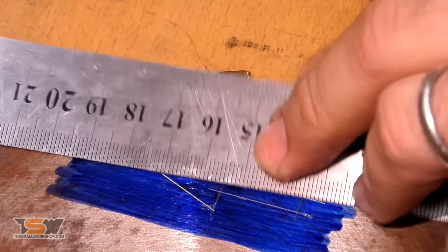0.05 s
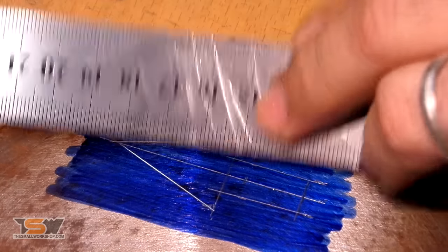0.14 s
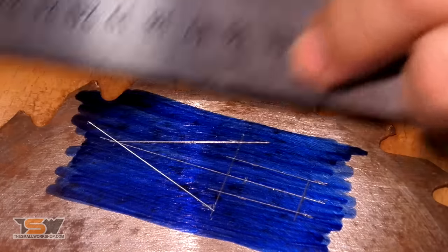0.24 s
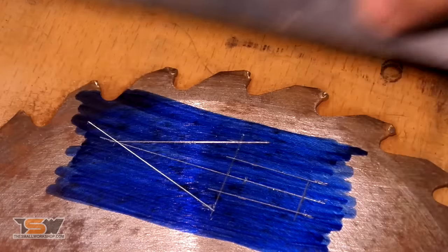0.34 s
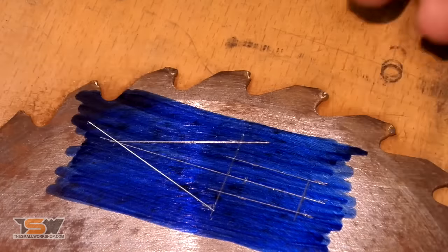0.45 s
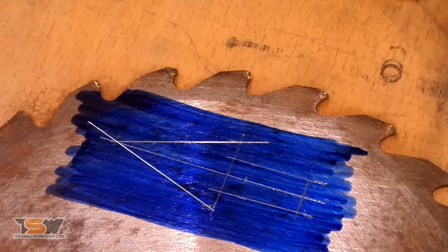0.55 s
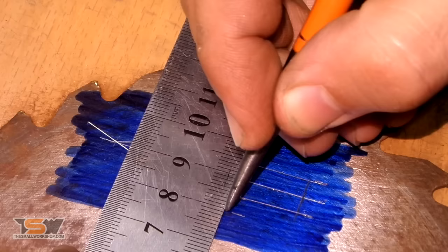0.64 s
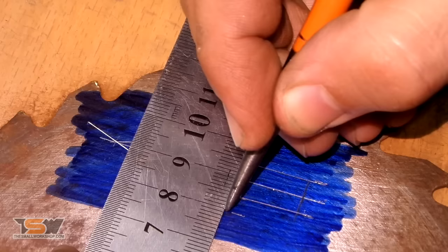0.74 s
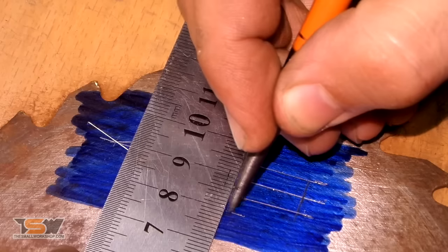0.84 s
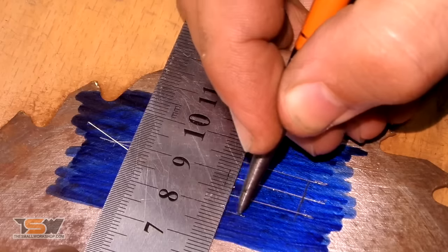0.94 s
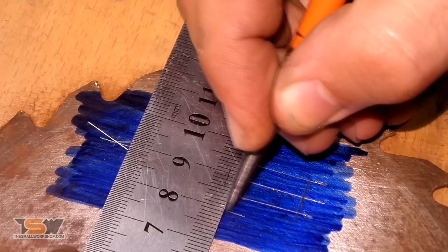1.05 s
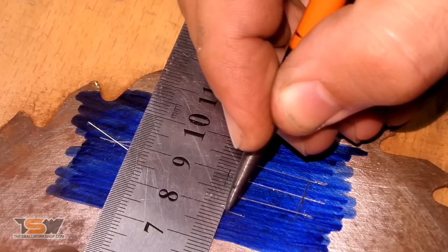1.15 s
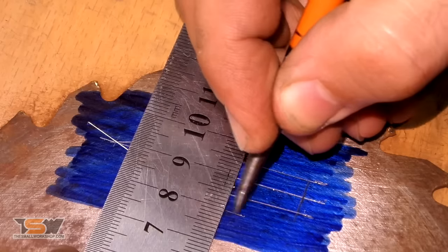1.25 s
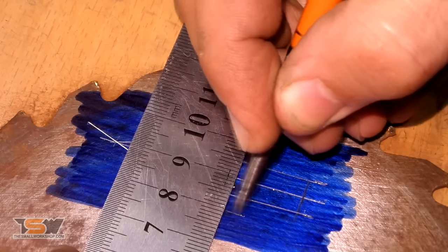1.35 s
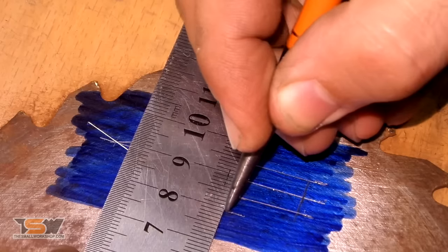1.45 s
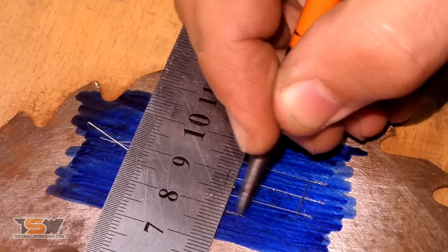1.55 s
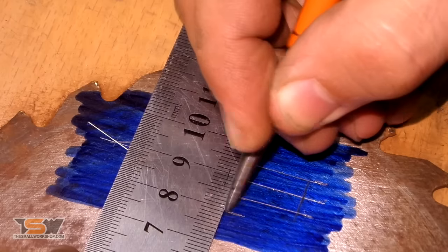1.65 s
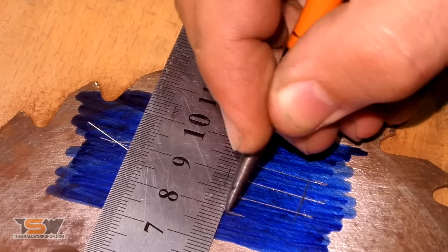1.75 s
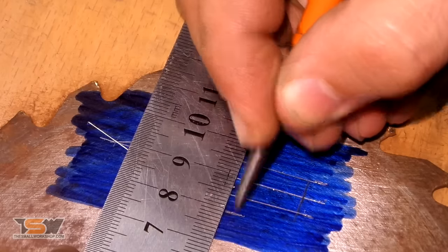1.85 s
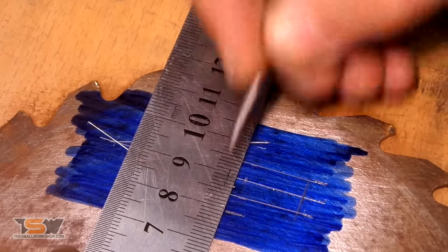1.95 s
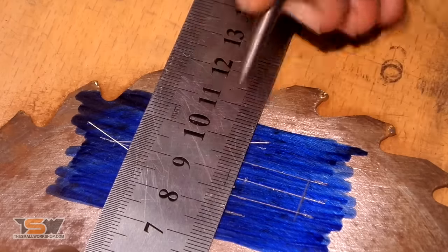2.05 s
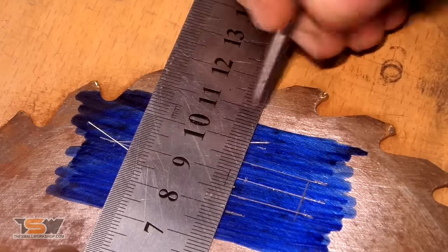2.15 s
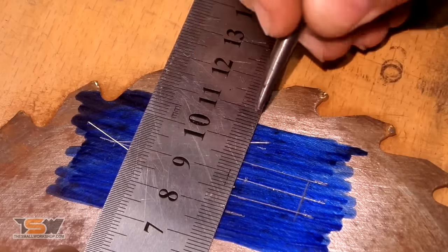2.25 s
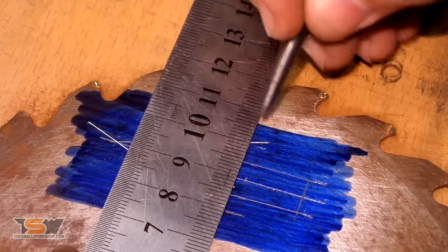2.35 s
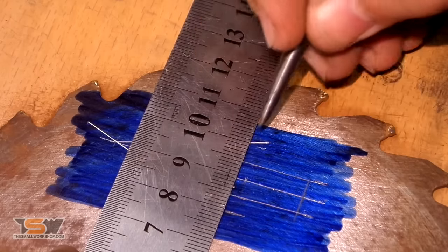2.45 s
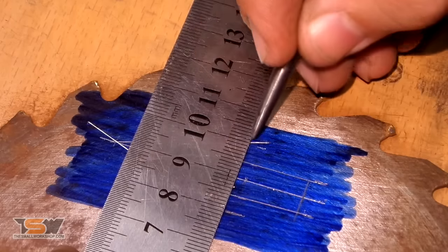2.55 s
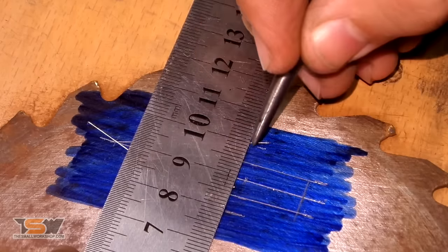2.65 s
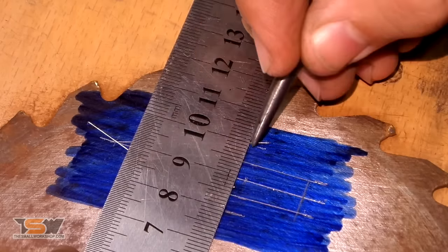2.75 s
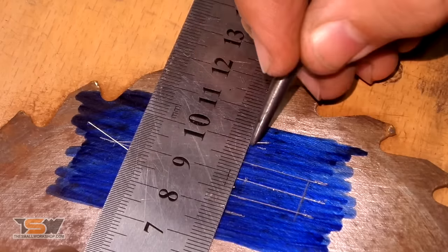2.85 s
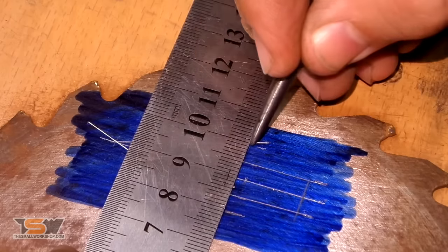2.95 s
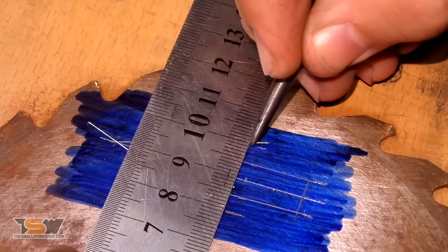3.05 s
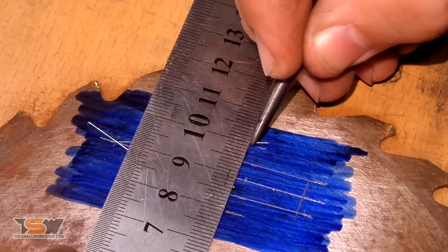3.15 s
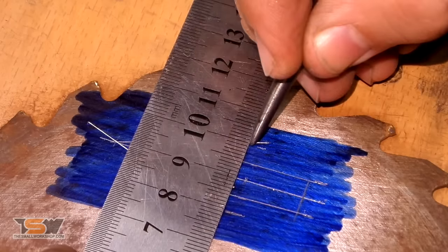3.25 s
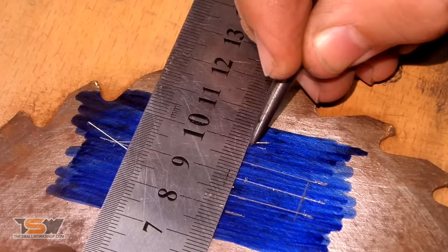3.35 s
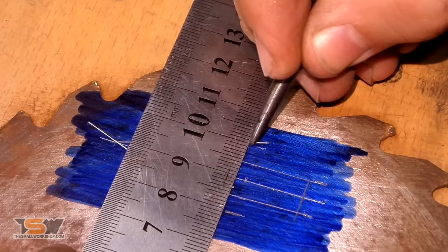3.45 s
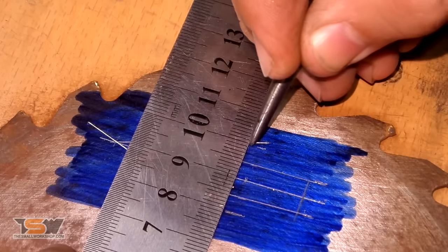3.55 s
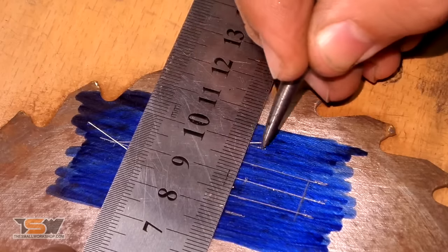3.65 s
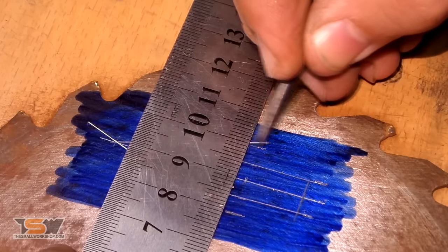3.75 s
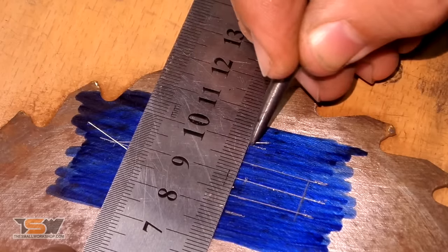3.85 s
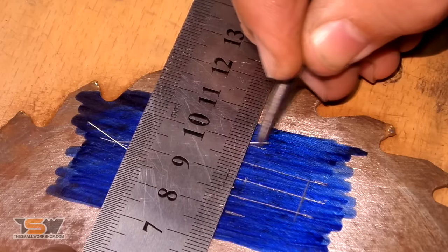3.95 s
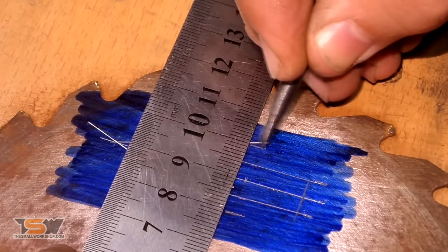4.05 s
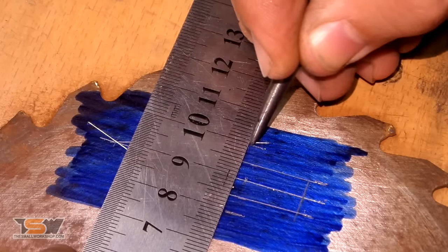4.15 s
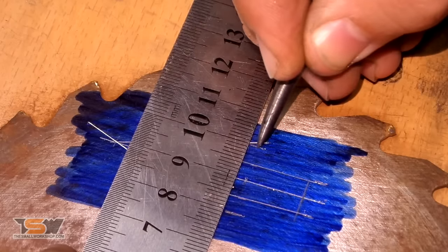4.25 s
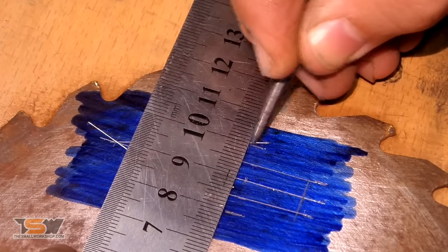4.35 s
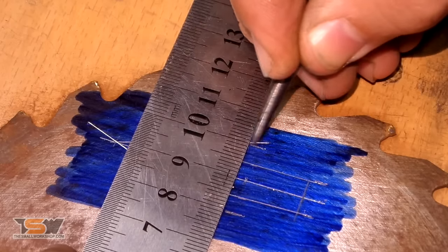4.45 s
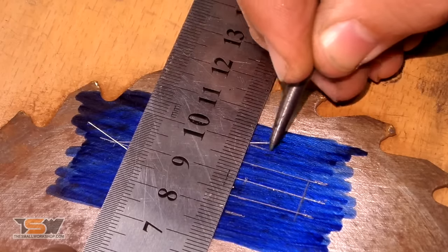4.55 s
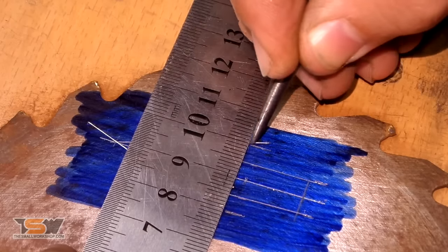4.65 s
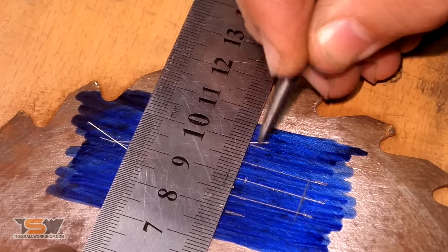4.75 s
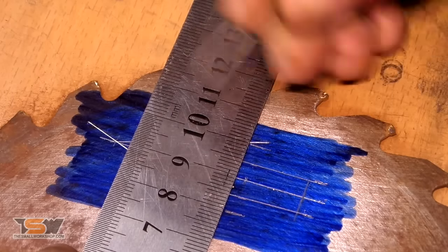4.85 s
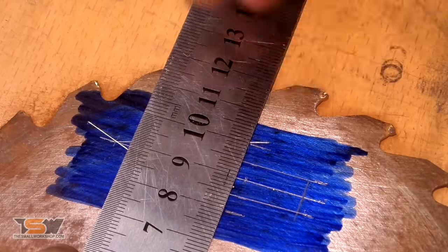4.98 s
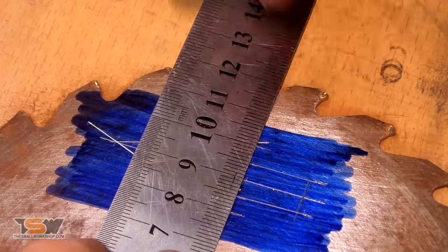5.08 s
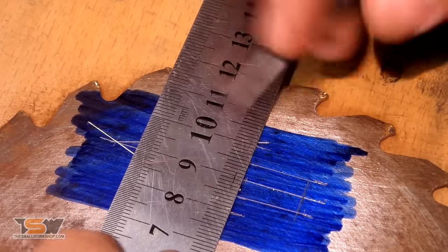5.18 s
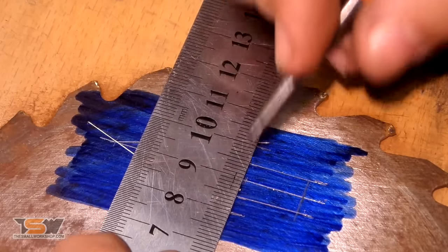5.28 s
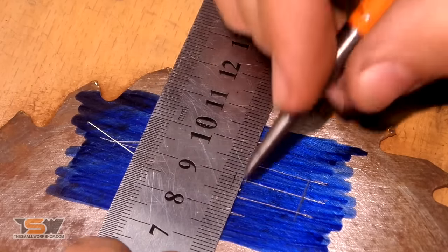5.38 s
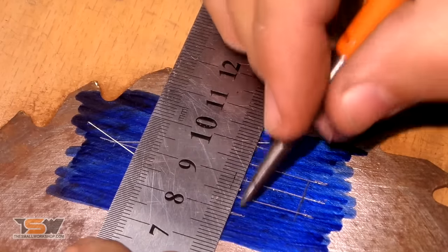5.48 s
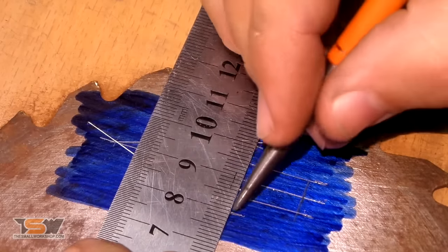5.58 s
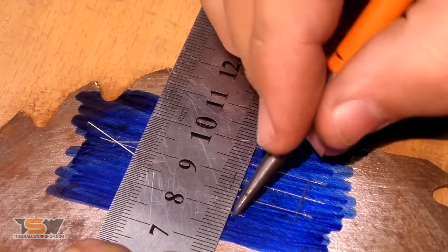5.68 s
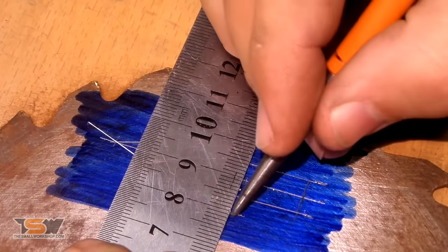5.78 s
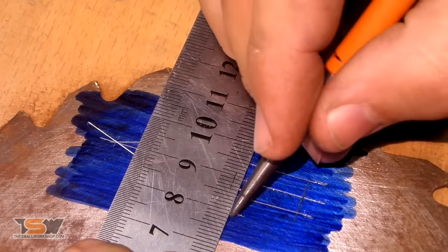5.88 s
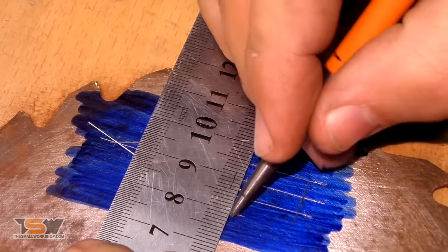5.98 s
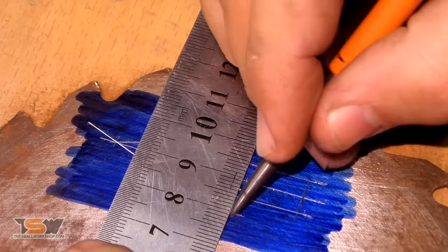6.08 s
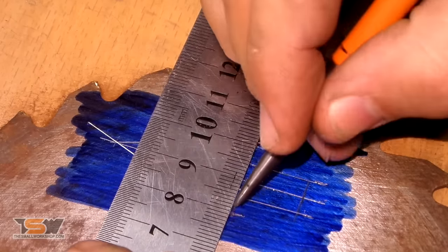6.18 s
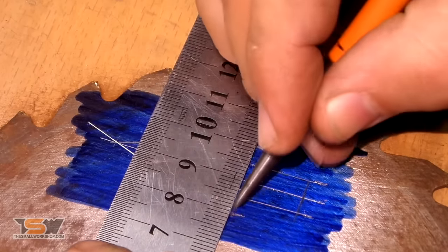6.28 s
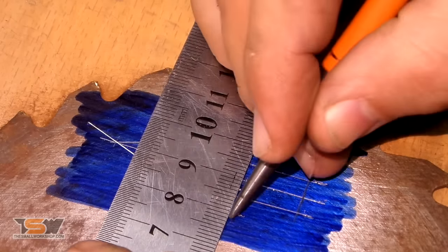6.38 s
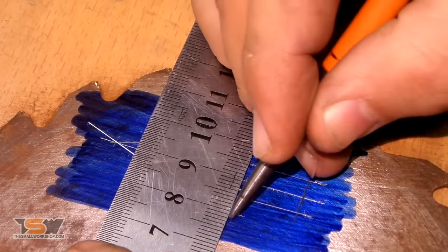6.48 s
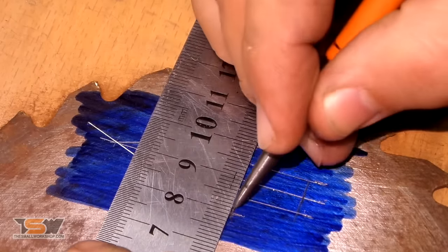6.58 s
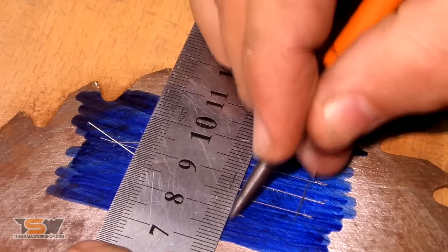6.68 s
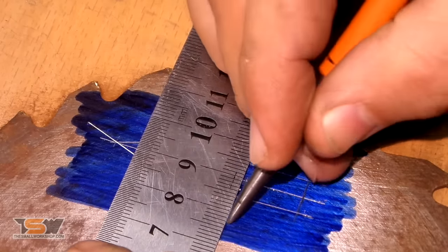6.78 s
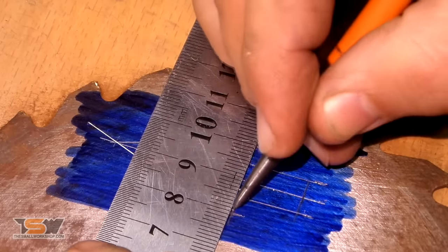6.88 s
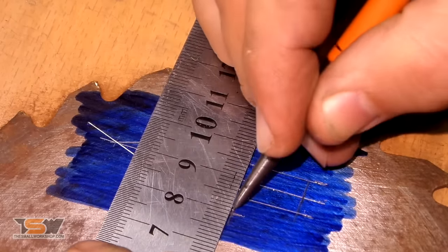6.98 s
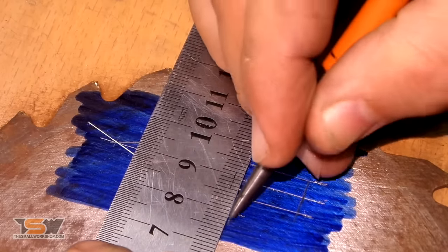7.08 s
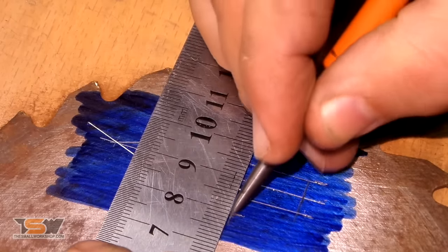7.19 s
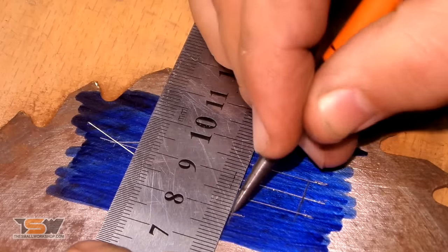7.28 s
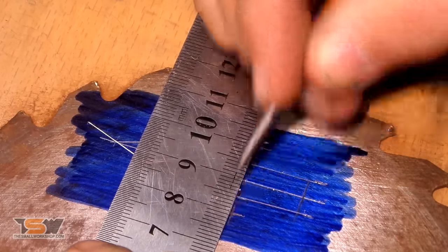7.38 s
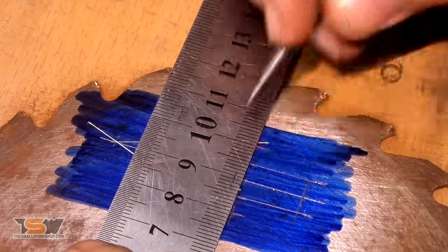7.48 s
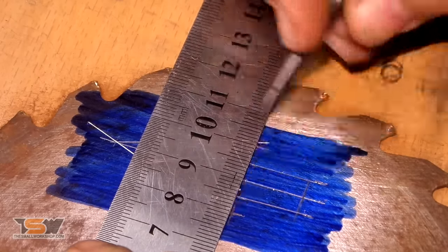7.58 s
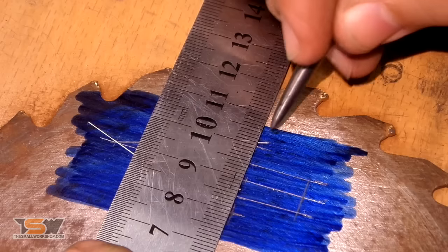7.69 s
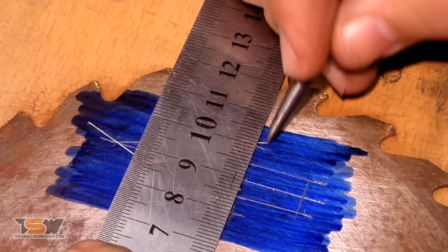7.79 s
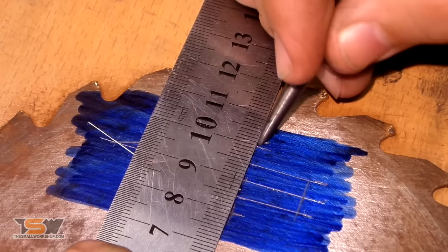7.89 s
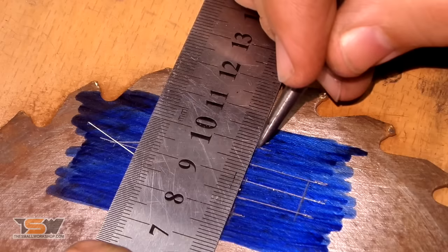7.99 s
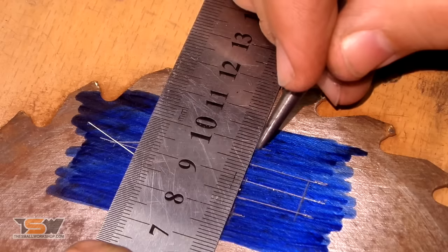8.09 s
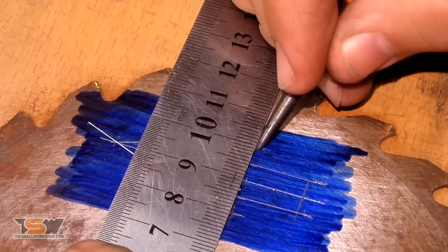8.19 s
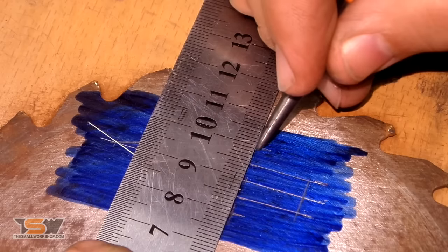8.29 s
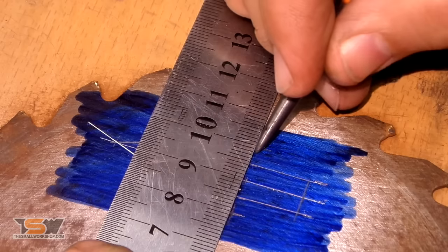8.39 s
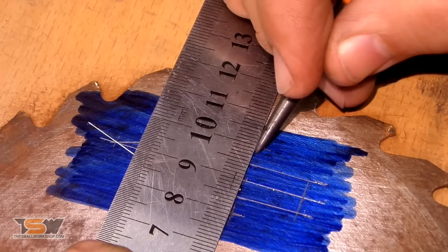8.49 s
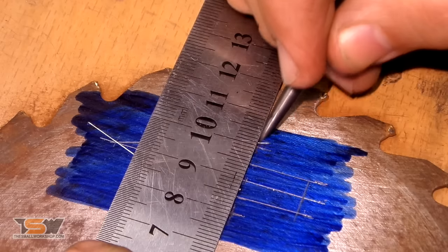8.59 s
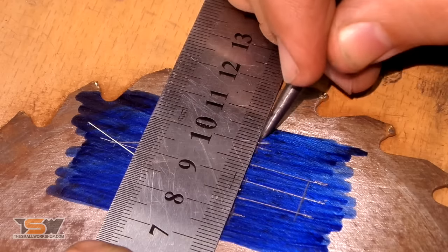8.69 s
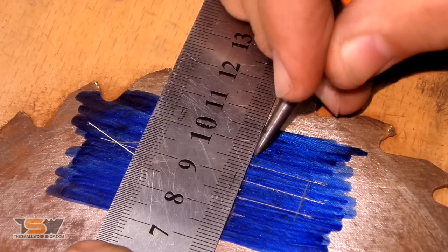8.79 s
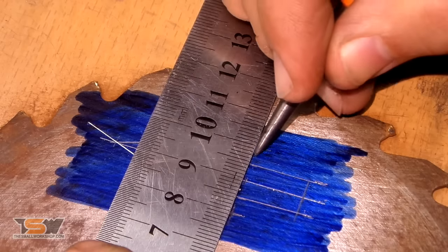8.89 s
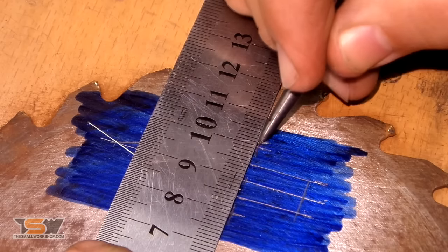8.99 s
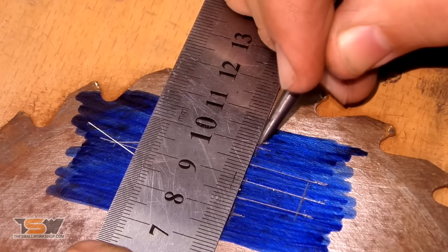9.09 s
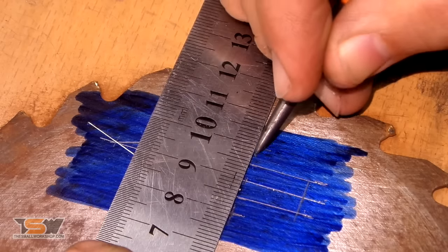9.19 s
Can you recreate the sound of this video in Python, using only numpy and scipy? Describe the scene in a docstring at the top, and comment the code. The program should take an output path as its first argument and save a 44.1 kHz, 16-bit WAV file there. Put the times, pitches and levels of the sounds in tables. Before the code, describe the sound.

Close up, a steel rule slides with a fine hiss and a small knock, then a scriber scrapes short gritty strokes on a saw blade, clacking sharply. After pauses for repositioning come further bursts: one with the hardest clicks, one smoother and longer, one fast and scratchy. A low unsteady machine rumble and faint hiss sit behind, in a small dry workshop.

```python
"""A steel scriber dragged to and fro along a steel rule on a saw blade: gritty slips drive blade, edges and bench.
It clacks on the rule's edge: noise blows and dying rattles through scriber, blade and wooden bench.
Light taps are noise puffs and ringing notes; between passes rule and fingers slide with a hiss of fine grit.
A small workshop answers with short noise tails, over a low machine rumble and microphone hiss of shaped noise."""
import sys
import numpy as np
from scipy import signal
from scipy.fft import rfft, irfft, next_fast_len
from scipy.io import wavfile
from scipy.ndimage import uniform_filter1d, map_coordinates

SR = 44100
rng = np.random.default_rng(int(sys.argv[2]) if len(sys.argv) > 2 else 0)


def convert_level_to_amplitude(level_db):
    """Map a level in decibels to its linear amplitude factor."""
    exponent = np.asarray(level_db, float) / 20
    return 10 ** exponent


def store_pcm(level_fs):
    """Save levels as 16-bit WAV."""
    pcm = np.round(np.clip(level_fs, -1, 1) * 32767).astype(np.int16)
    wavfile.write(sys.argv[1], SR, np.atleast_2d(pcm).T)


N = 407043

# point strokes: (start [s], rise [s], hold [s], grating [dB], edge above grating [dB], thump above grating [dB])
STROKES = [ (0.883, 0.029, 0.037, -46, -11, -16), (1.063, 0.018, 0.013, -33, -9, -13),
           (1.258, 0.0074, 0.044, -38, -8, -6.5), (1.391, 0.01, 0.037, -31, -7, -9.5),
           (1.552, 0.019, 0.026, -37.5, -8, -4.5), (1.664, .009, .024, -34.5, -4.5, -9),
           (1.828, 0.0059, .014, -32.5, -7.5, -6), (1.935, 0.0061, 0.011, -54, -17, 15),
           (1.986, 0.014, .008, -53.5, -4, 3), (2.945, 0.0037, 0.032, -48.5, -18, 4),
           (3.376, 0.13, .1, -55.5, -16, -0.5), (3.608, 0.014, 0.013, -44, -13, 0),
           (3.643, 0.016, 0.013, -39, -10, -4.5), (3.782, 0.0052, 0.018, -35.5, -10, -5),
           (3.968, .014, 0.041, -42, -6.5, -4), (4.087, 0.027, 0.013, -29.5, -11, -7.5),
           (4.231, .012, 0.012, -41, -6, -7), (4.378, 0.013, .005, -33, -8, -13),
           (4.498, 0.016, 0.0095, -35.5, -6.5, -11), (4.536, 0.015, .012, -42.5, -5, -12),
           (4.618, 0.017, 0.03, -34, -7, -2.5), (4.727, .014, 0.018, -32, -20, -12),
           (5.69, 0.0033, 0.0054, -38, -5, 0.5), (5.721, .003, 0.0093, -33.5, -8, -5),
           (6.127, 0.03, 0.037, -38, -9, 1.5), (6.328, 0.0039, 0.058, -32, -9.5, -3.5),
           (6.554, 0.023, 0.025, -35, -9.5, -1.5), (6.704, 0.0094, 0.062, -29, -7.5, -4),
           (6.854, 0.018, 0.052, -35.5, -7.5, -2), (7.056, 0.0017, 0.023, -27.5, -13, -4),
           (7.107, 0.0025, 0.011, -31.5, -7.5, -3.5), (7.21, 0.01, 0.037, -40.5, -4.5, -3),
           (7.899, 0.005, 0.039, -34.5, -11, -9), (7.998, 0.019, 0.015, -40.5, -20, 2),
           (8.038, 0.0043, 0.0067, -36, -27, -8), (8.073, 0.0056, 0.0097, -31.5, -16, -9),
           (8.111, 0.0078, 0.0087, -30.5, -17, -5), (8.146, 0.0036, 0.013, -38.5, -14, -4),
           (8.38, .008, 0.018, -38, -14, -2.5), (8.553, 0.051, 0.026, -32.5, -7.5, -7.5),
           (8.751, 0.035, 0.038, -24.5, -10, -6), (8.957, 0.041, 0.034, -36.5, -6.5, -1.5),
           (9.098, .006, 0.011, -46, -13, -4), (9.136, 0.0034, 0.041, -28, -8, -2), ]
# rule and blade edge, rubbed: (centre [Hz], width [Hz], relative level [dB])
EDGE_MODES = [(4610, 290, 6.5), (4940, 130, 9.5), (5240, 100, 8.5), (5910, 390, 7.5), (6900, 280, 6.5),
              (7830, 160, 10), (11180, 420, 1), (14000, 407, 8)]


def strokes():
    """The grating point drives the blade, shakes the bench and sets the edges singing."""
    shape = dict(under_db=16.5, rise_curve=1.6, sag_db_per_s=48, release_s=0.016, release_share=0.51)
    grate_rows = [row[:4] for row in STROKES]
    thump_rows = [(*when, db + above_db) for *when, db, _, above_db in STROKES]
    bright_rows = [(*when, db + above_db) for *when, db, above_db, _ in STROKES]
    grate = gesture(grate_rows, **shape)
    thump = gesture(thump_rows, **shape, follows=0.67)  # the heavy bench swings less widely
    bright = gesture(bright_rows, **shape, dulls_db_per_s=49)  # the fresh bite is brightest

    slips = grit(3000, spread_db=2.5, judder_db=1.5)  # the same catches are heard low and high
    force = grate * slips
    dense_db = [-5, -4, -3, -4.5]  # grips 1-4
    steel = blade(force, (0, 1, 2, 3)) + dense_blade(convert_level_to_amplitude(dense_db)[grip()] * force)
    wood = bench(thump * rng.standard_normal(N))

    edge = body(EDGE_MODES)

    def edge_response(f):
        broad = (1j * f / (4000 + 1j * f)) ** 2 * 7000 / (7000 + 1j * f)
        return 0.67 * edge(f) + 0.82 * broad

    scrape = bright * (0.48 * slips + 0.57 * rng.standard_normal(N))
    return steel + wood + filtered(scrape, edge_response)


def gesture(rows, under_db, rise_curve, sag_db_per_s, release_s, release_share, follows=1, dulls_db_per_s=0):
    """Gain of gestures that set in under their level, rise to it, sag while held and let go."""
    out = np.zeros(N)
    gone_db = 30  # drop over one fall_s
    for s, rise_s, hold_s, db in rows:
        fall_s = release_s + release_share * (rise_s + hold_s)
        end_s = s + rise_s + hold_s + 2 * fall_s
        at = np.arange(round(s * SR), min(round(end_s * SR), N))
        t = at / SR - s
        rising_db = under_db * np.clip(1 - t / rise_s, 0, 1) ** rise_curve
        sagging_db = sag_db_per_s * np.clip(t - rise_s, 0, None)
        release_db = gone_db * np.clip((t - rise_s - hold_s) / fall_s, 0, None)
        swing_db = follows * (rising_db + sagging_db + release_db)
        onset = np.clip(t / 0.0006, 0, 1)
        out[at] += onset * convert_level_to_amplitude(db - swing_db - dulls_db_per_s * t)
    return out


def grit(rate_hz, spread_db, judder_db):
    """Tiny slips at random moments with a long tail of sizes, in clumps as the point judders."""
    when, sign, size = rng.random((3, N))
    sizes = convert_level_to_amplitude(-spread_db * np.log(size + 0.0007))
    slips = (when < rate_hz / SR) * np.sign(sign - 0.5) * sizes
    return unit(slips * convert_level_to_amplitude(judder_db * wobble(90)))


def wobble(knots_per_s):
    """A smooth random curve through evenly spaced knots."""
    knots = rng.standard_normal(int(N * knots_per_s / SR) + 4)
    return map_coordinates(knots, [np.arange(N) * knots_per_s / SR])


# saw blade: (centre [Hz], width [Hz], rubbed in grips 1-4 [dB, four columns], struck in grip 1 [dB],
# struck in grips 2-4 [dB]), levels relative
BLADE_MODES = [(345.7, 32.2, 4, 2, 1, -10, -1.5, -6), (409, 93, -4, -3.5, 1, 7, -15.5, -13),
               (586, 46, -15, -14, -6.5, -4, -8.5, -11), (621, 24, -6, -8.5, -1, -3, -9, -13),
               (727, 68, -12, -11.5, -10.5, -22, -9.5, -12.5),
               (890, 205, -8.5, -13.5, -8.5, -14, -15, -12.5), (1060, 36, -11, -8.5, -9, -3.5, -13.5, -14),
               (1171, 219, -9.5, -10, -7.5, -3.5, -10, -10.5), (1275, 141, -9, -9.5, -7.5, -7.5, 0.5, -3),
               (1439, 120, -8.5, -10.5, -9, -20.5, -1, -10), (1496, 100, -24, -31, -33, -24, -7, -30),
               (1881, 41, -15, -8, -9, 1.5, -8, -5), (2013, 28, -23, -17.5, -24.5, -14.5, -35, -17.5),
               (2332, 170, -15, -20.5, -26.5, -34, -38, -19),
               (2410, 37, -17, -21.5, -27.5, -21, -19, -16.5),
               (2783, 170, -8, -12.5, -14.5, -14, -7.5, -16),
               (3200, 820, -16.5, -19, -17, -41, -19.5, -19.5),
               (3790, 100, -13, -21, -29, -52, -18.5, -34.5),
               (4210, 150, -24, -18.5, -23.5, -15.5, -14.5, -14),
               (6340, 170, -17.5, -38, -27.5, -42, -20, -42.5)]


def blade(force, columns):
    """The blade's resonances, their strengths set by the level column of the current grip."""
    column = np.array(columns)[grip()]
    out = np.zeros(N)
    for k in sorted(set(columns)):
        modes = [(hz, width_hz, db[k]) for hz, width_hz, *db in BLADE_MODES]
        out += filtered(force * (column == k), body(modes))
    return out


# grip boundaries: (time [s])
REGRIP_S = [0, 2.5, 5.3, 7.5, 10]


def grip():
    """Which way the blade is held at each sample, counted from 0."""
    return np.searchsorted(REGRIP_S, np.arange(N) / SR, side="right") - 1


# crowd of weak blade modes: (centre [Hz], width [Hz], relative level [dB])
DENSE_MODES = [(1210, 2100, 4), (3480, 2380, -1.5)]


def dense_blade(force):
    """The blade's many weak modes, merged into broad resonances."""
    return filtered(force, body(DENSE_MODES))


# wooden bench: (centre [Hz], width [Hz], relative level [dB])
BENCH_MODES = [(55, 7.4, -1.5), (126.2, 8.1, 4), (165.5, 15.6, -1), (202, 40, -1), (231.6, 60, -1.5)]


def bench(force):
    """The bench's low resonances under a shaking force."""
    return filtered(force, body(BENCH_MODES))


# strikes on the rule's edge: (time [s], level [dB], blade ring above it [dB], blade t60 [s])
CLACKS = [(0.0149, -34, -16, 0.072), (1.1021, -8, -5.5, 0.038), (1.428, -5.5, -8.5, 0.041),
          (1.6982, -9, -1.5, 0.039), (3.8138, -13, -6.5, 0.065), (4.1246, 0.5, -10, 0.053),
          (4.3951, -3.5, -8.5, 0.061), (4.6617, -3, -10, 0.06), (4.8592, -29, -14.5, 0.056),
          (5.692, -30, -6.5, 0.049), (7.0579, -24.5, 5.5, 0.038), (7.8985, -16.5, -6.5, 0.075),
          (8.7857, -19.5, -3.5, 0.093)]
# scriber rod: (centre [Hz], width [Hz], relative level [dB])
SCRIBER_MODES = [(4770, 120, -8), (5240, 94, -2.5), (6400, 530, -17.5), (8340, 240, 6.5), (9760, 94, -15),
                 (10600, 41, -6), (11700, 50, -38), (14600, 130, -8), (13000, 200, -4), (14020, 84, 9)]


def clacks():
    """Each strike is a sharp blow and a dying rattle, heard through the scriber, the blade and the bench."""
    tip, push = np.zeros(N + SR), np.zeros(N + SR)
    t = np.arange(SR // 5) / SR
    swell = 1 - np.exp(-t / 0.00071)  # bending waves take a moment to fill the blade
    for s, db, blade_db, t60_s in CLACKS:
        at = round((s + 0.0007) * SR)
        blow = convert_level_to_amplitude(-60 * t / 0.0084)
        rattle = convert_level_to_amplitude(-11.5 - 75 * t / t60_s)
        tip[at:][:len(t)] += convert_level_to_amplitude(db - 6.5) * (blow + rattle) * rng.standard_normal(len(t))
        ring = convert_level_to_amplitude(db + blade_db - 2.5 - 60 * t / t60_s)
        push[at:][:len(t)] += ring * swell * rng.standard_normal(len(t))
    tip, push = tip[:N], push[:N]
    rod = body(SCRIBER_MODES)
    crack = filtered(tip, lambda f: 0.67 * rod(f) + 0.35 * 1j * f / (4000 + 1j * f))
    steel = blade(push, (4, 5, 5, 5)) + convert_level_to_amplitude(-7) * dense_blade(push)
    return crack + steel + convert_level_to_amplitude(-21.5) * bench(push)


# rule and fingers on steel: (start [s], rise [s], hold [s], hiss [dB], singing above hiss [dB])
SLIDES = [(0.005, .012, .004, -45.5, -8), (0.085, 0.064, .01, -56, -8), (0.158, 0.027, 0.059, -35.5, -4.5),
          (0.529, 0.013, 0.02, -50.5, 3.5), (0.569, .015, .02, -52, 2.5), (0.63, .02, 0.059, -64, -14),
          (1.938, .04, 0.032, -62, 2), (2.316, 0.011, 0.042, -57.5, 3.5), (2.387, .03, .02, -65, 0),
          (4.862, .003, 0.046, -56.5, -6), (5.096, 0.01, 0.0075, -47.5, 6),
          (5.155, 0.028, 0.054, -56.5, -20), (5.31, .025, .11, -62, -3), (5.992, .004, .012, -57.5, -15)]
# sliding hiss spectrum: (frequency [Hz], relative density [dB per Hz])
SLIDE_SPECTRUM = [(880, -25), (1500, -13), (3690, -15.5), (3960, -10), (4460, -19), (5220, -5.5),
                  (9850, -10), (14200, -5.5), (16000, -16)]
# singing rule: (centre [Hz], width [Hz], relative level [dB])
RULE_MODES = [(5120, 120, 6.5), (5500, 220, 2), (5680, 240, 2)]


def slides():
    """Broad steel faces rubbing: dense fine grit, bright and uneven, that also makes the rule sing."""
    shape = dict(under_db=18, rise_curve=1.9, sag_db_per_s=13, release_s=0.028, release_share=0.2)
    hiss = gesture([row[:4] for row in SLIDES], **shape)
    song = gesture([(*when, db + above_db) for *when, db, above_db in SLIDES], **shape)
    fine_grit = grit(9000, spread_db=2.5, judder_db=2.5)
    rub = filtered(fine_grit, lambda f: unit_gain(convert_level_to_amplitude(along(SLIDE_SPECTRUM, f))))
    catches = grit(4000, spread_db=2.5, judder_db=2.5)
    return hiss * rub + 0.66 * filtered(song * catches, body(RULE_MODES))


# light taps of rule and tool: (time [s], level [dB], lowest [Hz], highest [Hz], t60 [s])
TAPS = [(0.1137, -37.5, 500, 2900, 0.1), (.116, -33, 197, 940, 0.16), (2.1258, -37.5, 596, 5150, 0.1),
        (2.83, -46, 300, 1860, 0.077), (5.7225, -40.5, 2800, 4870, 0.035), (5.726, -31, 610, 1700, 0.077),
        (2.905, -55, 890, 1500, 0.06), (6.335, -37, 892, 5960, 0.041), (6.57, -37.5, 900, 6000, 0.022),
        (6.751, -18, 150, 1190, 0.0091), (8.755, -38, 900, 6000, 0.024), (7.353, -39, 1500, 14000, 0.14),
        (7.3636, -29.5, 3500, 14000, 0.019), (7.36, -31, 515, 1550, 0.11),
        (7.5967, -24, 4700, 7900, 0.0074), (7.6, -34.5, 790, 4600, 0.076), (7.684, -37.5, 790, 4300, 0.085)]
# ringing notes: (time [s], level [dB], frequency [Hz], t60 [s])
NOTES = [(.116, -30, 322, 0.2), (0.1, -48, 760, 0.037), (.115, -37.5, 2600, 0.045),
         (2.332, -54, 3500, 0.22), (8.3, -50, 1000, 0.52), (7.363, -24.5, 4600, 0.022),
         (7.361, -34, 16000, 0.027), (7.364, -30, 944, 0.19), (7.601, -35, 358.7, 0.38)]


def taps():
    """Dying puffs of band-limited noise, and slightly wavering notes."""
    out, t = np.zeros(N + SR), np.arange(SR // 3) / SR
    for s, db, low_hz, high_hz, t60_s in TAPS:
        band = signal.butter(2, [low_hz, min(high_hz, SR / 2.2)], "band", fs=SR, output="sos")
        puff = convert_level_to_amplitude(db - 60 * t / t60_s) * rng.standard_normal(len(t))
        puff *= np.sqrt(SR / 2 / (high_hz - low_hz))  # makes up for the power outside the band
        out[round(s * SR):][:len(t)] += signal.sosfilt(band, puff)
    for s, db, hz, t60_s in NOTES:
        waver = 0.056 * np.cumsum(rng.standard_normal(len(t)))
        tone = np.sin(2 * np.pi * hz * t + waver)
        attack = 1 - np.exp(-t / 0.0005)
        out[round(s * SR):][:len(t)] += convert_level_to_amplitude(db - 60 * t / t60_s) * tone * attack
    return out[:N]


# workshop decay: (frequency [Hz], t60 [s])
SHOP_DECAY = [(150, 0.24), (1000, 0.12), (5000, 0.14), (14000, 0.11)]


def shop(x):
    """The walls' answer, each frequency dying at its own speed, drawn anew every quarter second."""
    out, hop = np.zeros(N + SR), SR // 4
    for start in range(0, N, hop):
        hz, t, z = signal.stft(rng.standard_normal(SR // 3), SR, nperseg=256)
        decay = convert_level_to_amplitude(-60 * t / along(SHOP_DECAY, hz)[:, None])
        tail = signal.istft(z * decay, SR, nperseg=256)[1]
        wet = signal.fftconvolve(x[start:start + hop], tail / np.linalg.norm(tail))
        out[start + 130:][:len(wet)] += wet  # delay in samples
    return out[:N]


# background spectrum: (frequency [Hz], relative density [dB per Hz])
AIR_SPECTRUM = [(15, -69), (25, -13), (53, -11.5), (87, -18.5), (149, -1), (180, -8), (256, -12.5),
                (384, -13), (451, -7), (503, -14), (818, -22), (1190, -25.5), (1520, -26.5), (14800, -40.5),
                (16000, -45.5)]
# machine casing: (centre [Hz], width [Hz], relative level [dB])
MACHINE_MODES = [(115, 5.7, 1), (153.7, 9.3, -2.5), (254.5, 8.6, -3.5), (336.4, 28, -14.5), (449, 11, -11),
                 (622, 18, -15.5)]
# background course: (time [s], relative rumble level [dB], relative hiss level [dB])
BACKGROUND = [(0.0, -49, -55.5), (0.49, -51.5, -62), (1.31, -52.5, -61.5), (3.32, -53, -62),
              (3.75, -52.5, -60.5), (4.7, -52, -60.5), (5.19, -52, -61.5), (6.01, -53.5, -62.5),
              (6.94, -51, -60.5), (7.38, -54, -63), (7.66, -52.5, -61.5), (7.99, -48.5, -62),
              (8.33, -55.5, -62), (8.84, -51, -62), (9.23, -59, -62.5)]


def background():
    """An unsteady machine rumble, with casing resonances, below and even hiss above."""
    def low(f):
        return 1 / (1 + (f / 900) ** 4)

    def spectrum(f):
        return convert_level_to_amplitude(along(AIR_SPECTRUM, f))

    rumble = unit(filtered(patchy(depth_db=3.0), lambda f: spectrum(f) * np.sqrt(low(f))))
    drone = unit(filtered(patchy(depth_db=1), body(MACHINE_MODES)))
    hiss = unit(filtered(rng.standard_normal(N), lambda f: spectrum(f) * np.sqrt(1 - low(f))))
    s, rumble_db, hiss_db = np.transpose(BACKGROUND)
    t = np.arange(N) / SR
    machine = convert_level_to_amplitude(np.interp(t, s, rumble_db)) * (0.7 * rumble + 0.64 * drone)
    return machine + convert_level_to_amplitude(np.interp(t, s, hiss_db) + 3.0) * hiss


def patchy(depth_db):
    """Noise whose level drifts separately in each small region of time and pitch."""
    z = signal.stft(rng.standard_normal(N), nperseg=1024)[2]
    field = uniform_filter1d(rng.standard_normal(z.shape), size=3, axis=0)
    field = uniform_filter1d(field, size=7, axis=1)
    gain = convert_level_to_amplitude(depth_db * np.clip(unit(field), -3, 2))
    return signal.istft(z * gain, nperseg=1024)[1][:N]


def unit(x):
    """Scaled to rms 1."""
    return x / np.sqrt(np.mean(x ** 2) + 1e-20)


def unit_gain(response):
    """A response that keeps the power of white noise."""
    return response / np.sqrt(np.mean(np.abs(response) ** 2))


def along(points, hz):
    """(frequency [Hz], value) points interpolated on a log frequency axis."""
    f, v = np.transpose(points)
    return np.interp(np.log(hz + 1), np.log(f + 1), v)


def filtered(x, response):
    """x times a complex response of frequency."""
    m = next_fast_len(N + SR // 2)
    return irfft(rfft(x, m) * response(np.fft.rfftfreq(m, 1 / SR)), m)[..., :N]


def body(modes):
    """Causal response of (centre [Hz], width [Hz], level [dB]) resonances, with gain 1 for noise."""
    def response(f):
        f = f.astype(np.float32)
        total = 0
        for k, (hz, width_hz, db) in enumerate(modes):
            detune = (f - hz * hz / (f + 1)) / width_hz
            total = total + (-1) ** k * float(convert_level_to_amplitude(db)) / (1 + 1j * detune)
        return unit_gain(total)
    return response


def scene():
    """Work on the bench, its echo and the background."""
    work = strokes() + clacks() + taps() + slides()
    return (work + convert_level_to_amplitude(-9) * shop(work) + background())[None]


def roll_off(x):
    """The treble ends steeply here."""
    return signal.sosfilt(signal.butter(12, 16480, fs=SR, output="sos"), x)


def record(dry):
    """The microphone loses the deepest bass."""
    mix = filtered(dry, lambda f: (1j * f / (35 + 1j * f)) ** 2)
    return roll_off(mix)


dry = scene()
out = record(dry)
store_pcm(out)
```